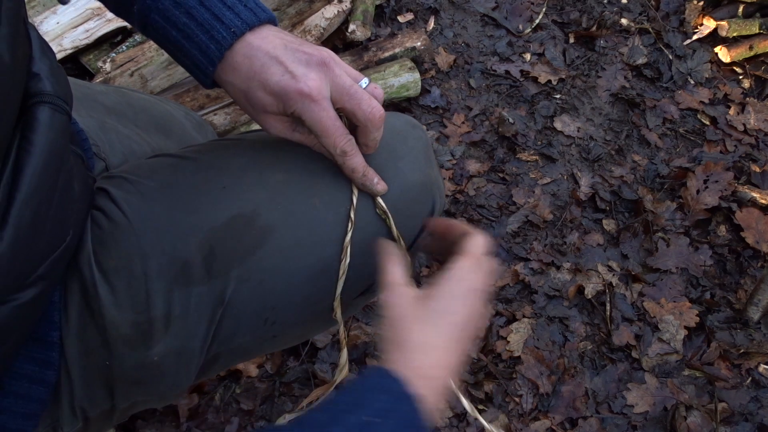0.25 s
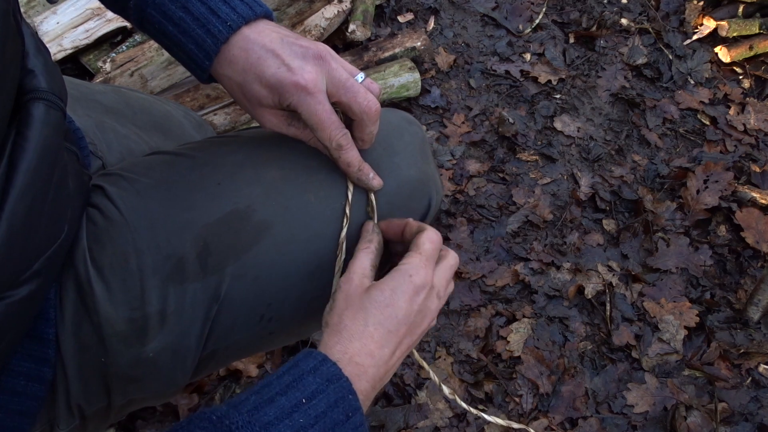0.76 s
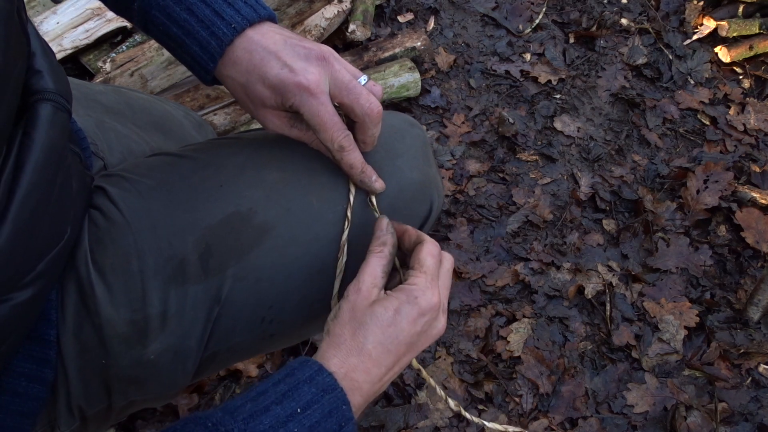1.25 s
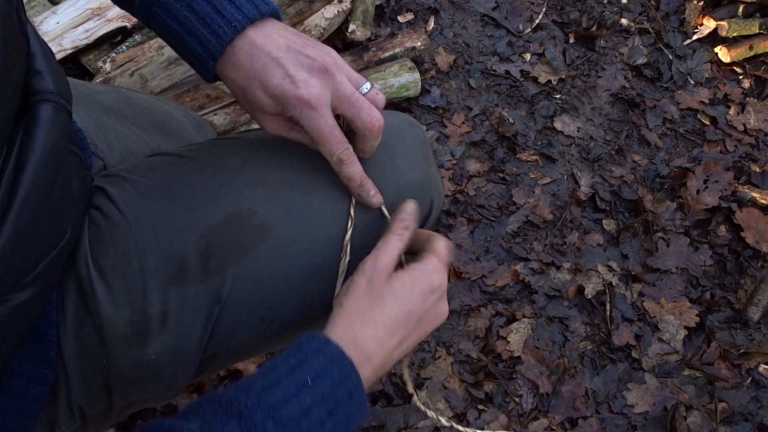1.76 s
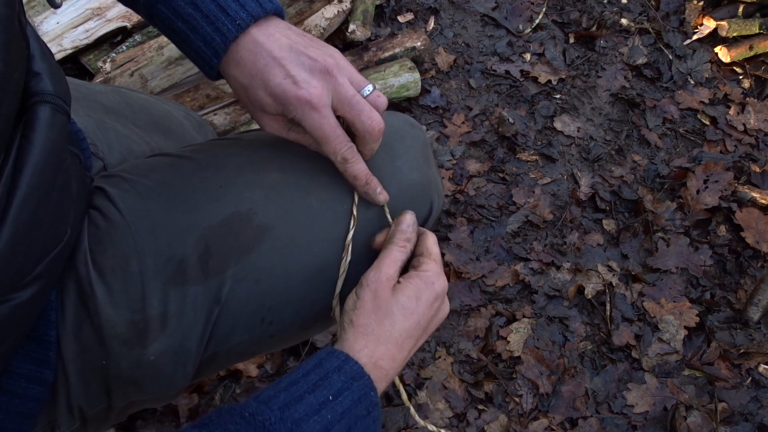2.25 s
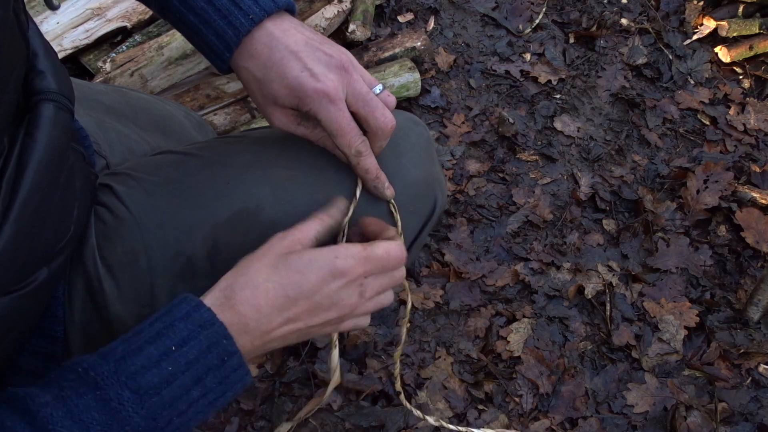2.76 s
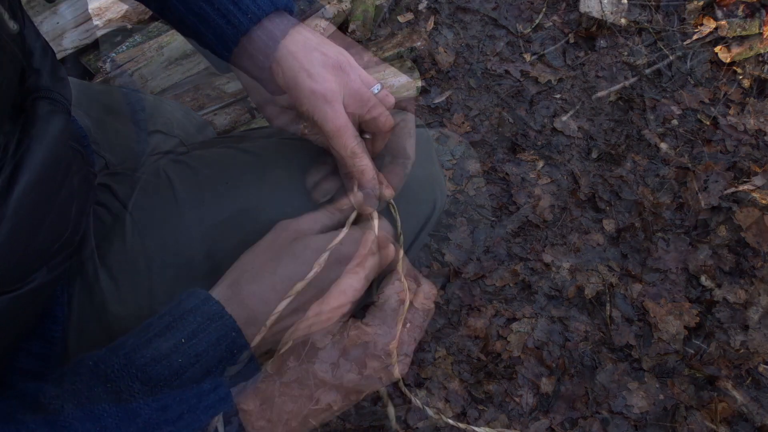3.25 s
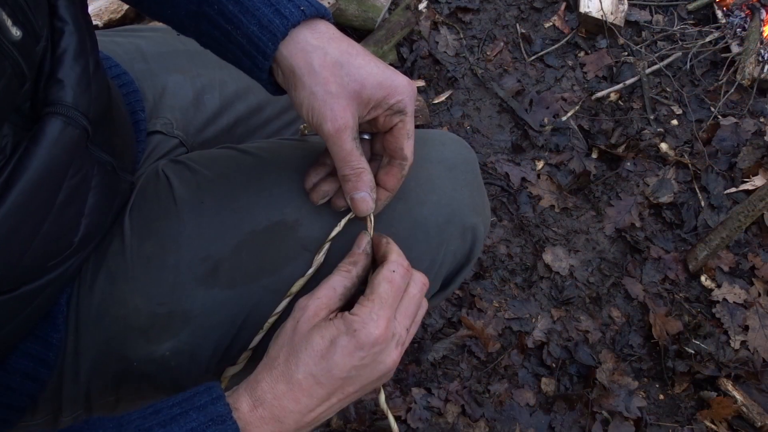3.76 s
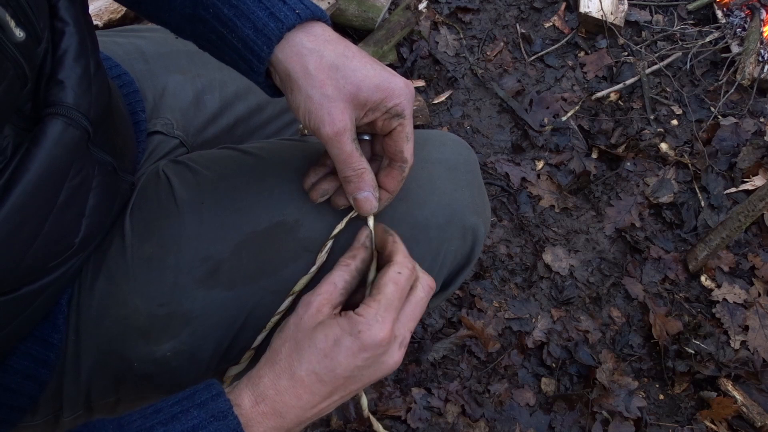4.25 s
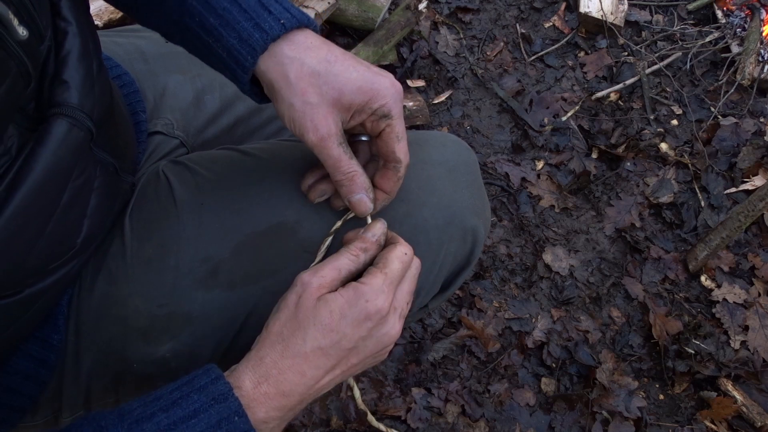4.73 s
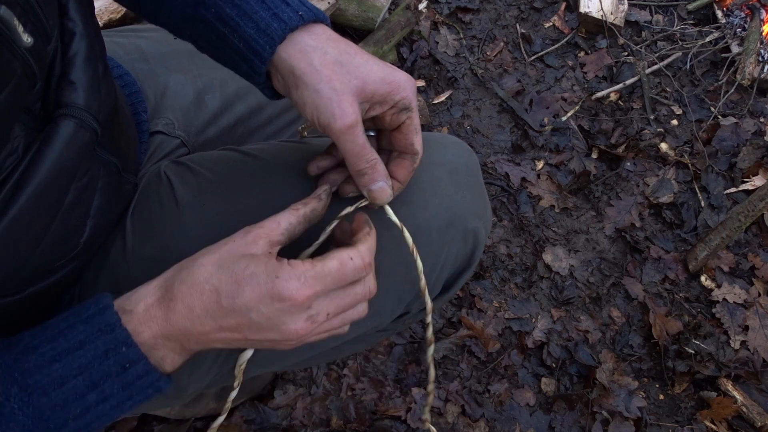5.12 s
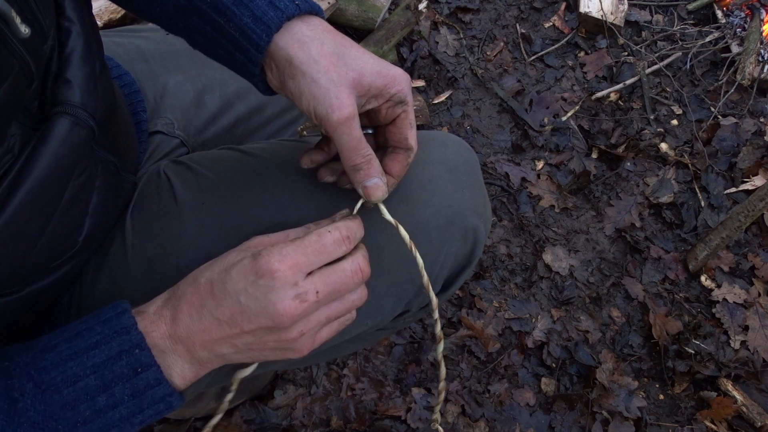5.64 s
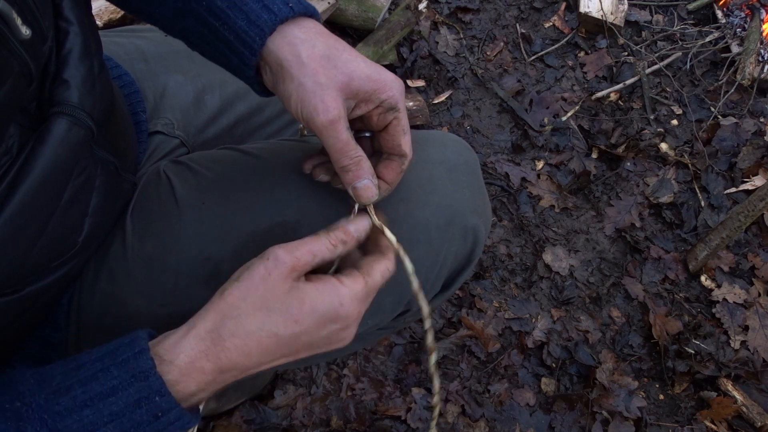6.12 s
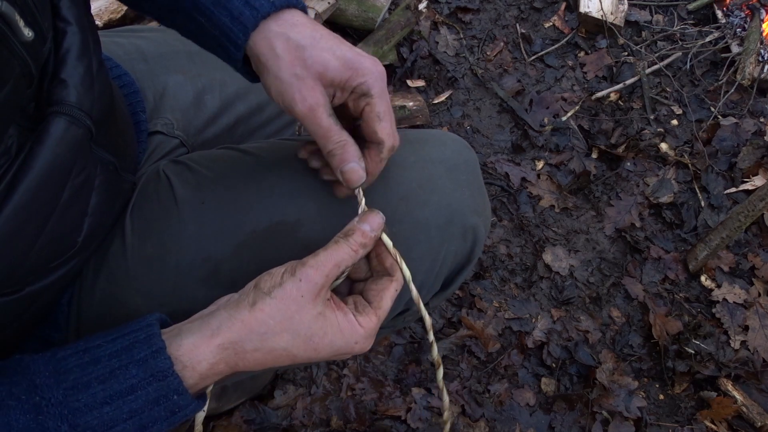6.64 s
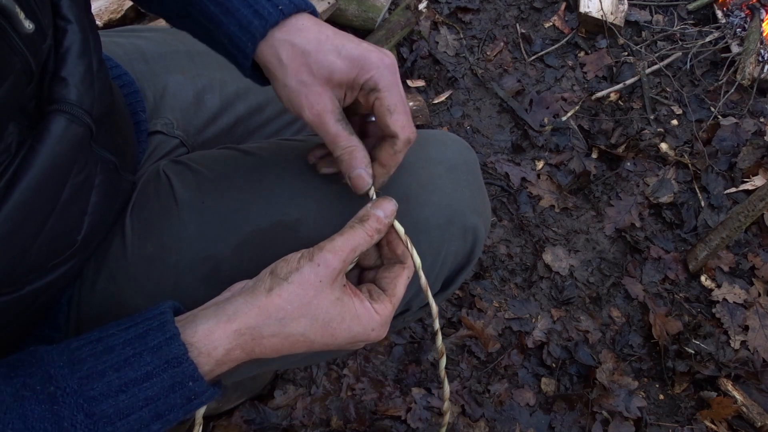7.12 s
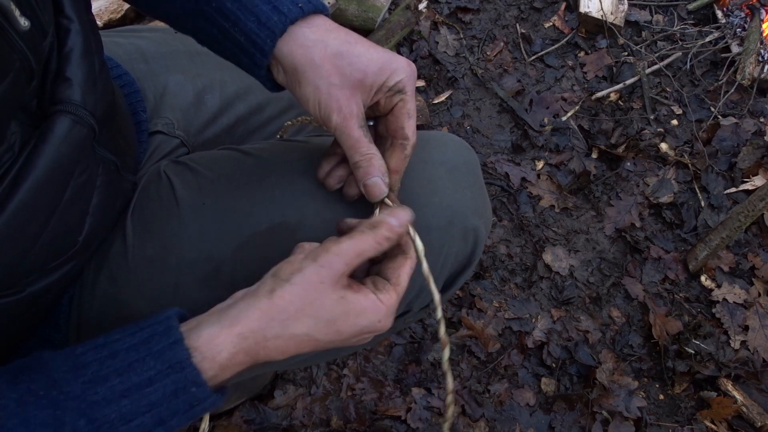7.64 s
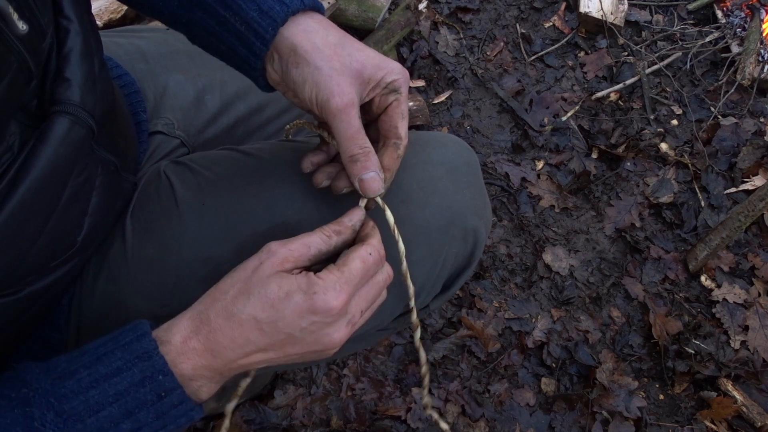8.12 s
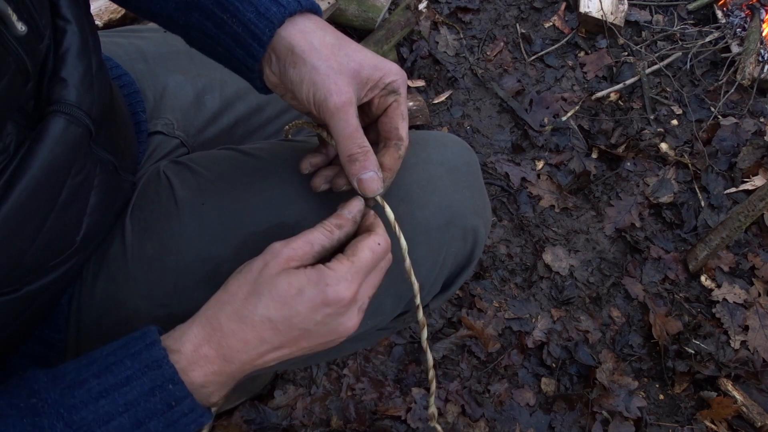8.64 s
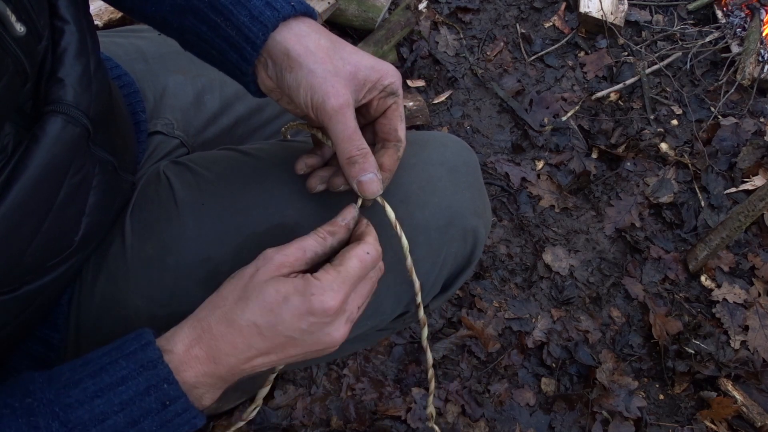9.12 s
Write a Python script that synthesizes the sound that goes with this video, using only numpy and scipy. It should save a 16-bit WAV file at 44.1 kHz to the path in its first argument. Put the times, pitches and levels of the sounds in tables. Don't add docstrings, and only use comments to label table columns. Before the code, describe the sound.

A woodland campfire, close stereo microphones a step away. A faint steady steam hiss, soft low flame flutter and distant low hum lie far beneath the crackle. At 0.1-0.5 s a dry bark cord drags with a grainy rustle and tiny fibre snaps. Separate pops follow, stronger at 1.2 and 1.8 s. At 2.3 s a log splits with the loudest bang, nearly full level, its bright echo scattering through the trees. Around 3.2-3.3 s the place crossfades to another spot by the fire: hiss duller, more sputtering. Snaps at 3.3 and 4.5 s lead to a dense run of hard cracks from 5.2 to 5.9 s. Smaller pops continue, with sharper ones at 7.2, 7.5, 7.8 and 8.0 s. Steam jets swell softly near 8.2 and 9.3 s among light ticks and a few snaps around 9 s.

```python
import sys
import numpy as np
from scipy import signal
from scipy.fft import rfft, irfft, next_fast_len
from scipy.io import wavfile
from scipy.ndimage import uniform_filter1d, map_coordinates

SR = 44100
rng = np.random.default_rng(int(sys.argv[2]) if len(sys.argv) > 2 else 0)


def gain_from_decibels(decibels):
    exponent = np.asarray(decibels, float) / 20
    return 10 ** exponent


def to_wav(sig):
    pcm = np.clip(np.atleast_2d(sig), -1, 1) * 32767
    pcm = np.round(pcm).astype(np.int16)
    wavfile.write(sys.argv[1], SR, pcm.T)


N = 414099

# leave_s, arrive_s
MOVE = (3.22, 3.34)


def unit(x):
    return x / np.sqrt(np.mean(x ** 2) + 1e-20)


def along(points, hz):
    f, v = np.transpose(points)
    return np.interp(np.log(hz + 1), np.log(f + 1), v)


def wobble(rate):
    knots = rng.standard_normal(int(N * rate / SR) + 4)
    return map_coordinates(knots, [np.arange(N) * rate / SR])


def swells(events, width_s):
    t = np.arange(N) / SR
    return sum(db * np.exp(-((t - s) / width_s) ** 2) for s, db in events)


def filtered(x, response):
    m = 2 * next_fast_len(x.shape[-1] // 2 + 512)
    spectrum = rfft(x, m) * response(np.fft.rfftfreq(m, 1 / SR))
    return irfft(spectrum, m)[..., :x.shape[-1]]


def resonance(f, hz, width_hz):
    return 1j * f * width_hz / (hz * hz - f * f + 1j * f * width_hz)


def again(f, delay, gain):
    return 1 + gain * np.exp(-2j * np.pi * f * delay)


def causal(gain_db):
    cepstrum = irfft(gain_db * np.log(10) / 20)
    cepstrum[1:len(gain_db) - 1] *= 2
    cepstrum[len(gain_db):] = 0
    return np.exp(rfft(cepstrum))


def add(track, s, sound):
    start = round(s * SR)
    track[:, start:start + sound.shape[1]] += sound


def moved():
    return np.interp(np.arange(N) / SR, MOVE, (0, 1))


def placed(first_db, second_db):
    return first_db + moved() * (second_db - first_db)


def rush(spectrum, patchy_db, start=0, stop=N):
    # pitch_hz, correlation
    likeness = [(40, .75), (130, 0.94), (700, 0.83), (1400, 0.87), (3000, 0.26), (7000, 1), (14000, .1)]
    z = signal.stft(rng.standard_normal((2, stop - start)), nperseg=512)[2]
    field = uniform_filter1d(rng.standard_normal(z.shape[1:]), size=6, axis=0)
    field = uniform_filter1d(field, size=14, axis=1)
    pair = signal.istft(z * gain_from_decibels(patchy_db * unit(field)), nperseg=512)[1][:, :stop - start]
    turn = lambda hz: np.arccos(np.clip(along(likeness, hz), -1, 1)) / 2
    mid, side = filtered(pair, lambda hz: gain_from_decibels(along(spectrum, hz)) * [np.cos(turn(hz)), np.sin(turn(hz))])
    return np.pad(unit(np.array([mid + side, mid - side])), ((0, 0), (start, N - stop)))


def two_places(first, first_patchy_db, second, second_patchy_db):
    leave, arrive = (np.array(MOVE) * SR).astype(int)
    before = np.sqrt(1 - moved()) * rush(first, first_patchy_db, stop=arrive)
    after = np.sqrt(moved()) * rush(second, second_patchy_db, start=leave)
    return before + after


def burst(scatter_db, t60):
    t = np.arange(512) / SR
    shared, left, right = rng.standard_normal((3, len(t)))
    apart = .3 * np.gradient([left, right], axis=1)
    scatter = (shared + apart) * gain_from_decibels(scatter_db - 60 * t / t60)
    scatter[:, 0] = 1
    broad = uniform_filter1d(np.abs(rfft(scatter[0])) ** 2, size=13)
    return irfft(rfft(scatter) * causal(-10 * np.log10(broad + 1e-6)))


def woodland(depth=1):
    # pitch_hz, t60_s
    trunk_t60 = [(200, .15), (1000, .3), (2500, 0.33), (5000, 0.41), (12000, .12)]
    hz, t, z = signal.stft(rng.standard_normal((3, SR // 3)), SR, nperseg=128)
    lumps_db = 3 * uniform_filter1d(rng.standard_normal(len(t)), size=2)
    trunks = gain_from_decibels(lumps_db - 60 * t / (depth * along(trunk_t60, hz)[:, None]))
    litter = gain_from_decibels(17.5 - 60 * t / .035)
    shared, left, right = signal.istft(z * (trunks + litter), SR, nperseg=128)[1]
    tail = shared + 0.54 * np.array([left, right])
    return tail / np.linalg.norm(tail[0])


def hum():
    # pitch_hz, density_db per Hz
    hum_colour = [(240, -33.5), (400, -10.5), (591, -2), (928, 0.5), (1460, -9), (2000, -16), (2600, -39.5),
                  (4400, -120)]
    return gain_from_decibels(placed(-60, -62)) * rush(hum_colour, patchy_db=1.3)


def flames():
    # pitch_hz, density_db per Hz
    flame_near = [(15, -37.5), (25, -7.5), (118, 0), (248, 0), (343, -5.5), (389, -3.5), (447, -10),
                  (500, -11), (650, -36), (1100, -120)]
    flame_far = [(15, -41), (25, -2), (75, 0.5), (172, 0.5), (500, -10), (650, -36), (1100, -120)]
    # peak_s, rise_db
    draughts = [(.2, 5.5), (.6, 2.5), (1, 3.5), (1.78, 4), (2.95, 1.5), (7.4, 1.5), (7.9, 1), (8.95, 2)]
    flutter_db = .8 * wobble(7)
    level_db = placed(-57.5, -59.5) + swells(draughts, width_s=.2) + flutter_db
    return gain_from_decibels(level_db) * two_places(flame_near, 1.2, flame_far, 1)


def steam():
    # pitch_hz, density_db per Hz
    steam_near = [(940, -19.5), (1600, -7.5), (1880, -3.5), (2570, -0.5), (2960, -6), (3260, -5), (3740, 0),
                  (6220, 3), (7690, -7), (8470, -4.5), (9880, -5), (16000, -42.5)]
    steam_far = [(940, -45), (1600, -9.5), (2160, -1.5), (2470, 0.5), (3430, -3.5), (5230, 0.5),
                 (6720, -0.5), (9690, -10), (16000, -35.5)]
    # peak_s, rise_db
    jet_times = [
        (8.2, 21),
        (9.3, 20),
    ]
    hiss = two_places(steam_near, .2, steam_far, 1.7)
    sputter_db = (.4 + .6 * moved()) * wobble(22)
    crack = filtered(hiss, lambda f: resonance(f, hz=6000, width_hz=2400))
    jet = gain_from_decibels(-21 + swells(jet_times, width_s=0.3)) * crack
    return gain_from_decibels(placed(-58, -63.2) + sputter_db) * (hiss + jet)


def cord():
    # pitch_hz, density_db per Hz
    bark_colour = [(300, -23.5), (1200, -4.5), (3000, -5), (6000, -5), (10000, -21), (14000, -53)]
    # start_s, full_s, let_go_s, end_s
    drag = (.1, .33, .45, .5)
    level_db = np.interp(np.arange(N) / SR, drag, (-64.5, -56, -56, -80), -120, -120)
    grains_db = 5.1 * wobble(260) - 4.0
    return gain_from_decibels(level_db + grains_db) * rush(bark_colour, 2.3, stop=SR)


def ticks():
    # start_s, peak_db, pitch_hz
    fibres = [(0.194, -45, 4670), (0.275, -41, 4520), (0.3304, -43, 5250), (0.344, -36, 5230),
              (0.3626, -44, 6000), (0.3844, -47, 5490), (0.4194, -45, 3820), (0.44, -38.5, 3300)]
    # start_s, peak_db, pitch_hz
    char_ticks = [(1.475, -43, 3470), (1.91, -49, 6010), (1.9824, -37, 5870), (2.908, -41, 5420),
                  (4.054, -46, 2860), (4.3927, -44, 2440), (4.433, -42.5, 6790), (4.7292, -36.5, 5980),
                  (4.7485, -45, 7500), (5.01, -36, 3700), (5.3029, -41, 6120), (5.3458, -43, 6520),
                  (5.3987, -38.5, 6050), (5.5912, -50, 3500), (5.9914, -45, 5700), (6.8838, -46, 5220),
                  (7.087, -40.5, 5450), (7.3903, -37, 9960), (8.1286, -40, 5860), (8.311, -41.5, 6060),
                  (8.4367, -45, 5800), (8.522, -47, 6780), (8.535, -43, 1990), (8.7867, -39, 5570),
                  (8.8347, -38, 5940), (8.888, -47, 5900), (9.1056, -46.5, 6440), (9.1262, -45, 5570),
                  (9.2366, -47, 6840), (9.3293, -43.5, 6410)]
    herald_times = [4.9468, 5.1405, 7.0266, 7.2012, 7.4401, 9.0759]
    # pitch_hz, gain_db
    path_gain = [(100, 11), (8000, 0.5), (11000, -3.5), (13000, -21.5), (16000, -32)]
    track = np.zeros((2, N + SR))
    when, size, pitch = rng.random((160, 3)).T
    swarm = np.transpose([when * N / SR, -60 + 8 * size ** 2, 3500 + 6500 * pitch])
    heralds = [(s, -48, 6300) for s in herald_times]
    for s, db, hz in [*fibres, *char_ticks, *heralds, *swarm]:
        char = lambda f: resonance(f, hz, 0.29 * hz) + 0.17 * resonance(f, 5000, 5000)
        add(track, s, gain_from_decibels(db + 19.5) * filtered(burst(-8.5, 0.011), char))
    return filtered(track[:, :N], lambda f: causal(along(path_gain, f)))


def bursts():
    # start_s, snap_db, knock_over_snap_db, spit_over_snap_db, pocket_hz
    deep_bursts = [(0.0493, -31.5, -8.5, -16.0, 1360), (0.6948, -35, 0, -26, 1340),
                   (1.6758, -28, -11, -30.0, 1310), (1.7647, -12.0, -18.0, -21.5, 1110),
                   (2.2712, -32, -9, -26, 2600), (2.6085, -33.5, -14, -33, 1150.0),
                   (2.9737, -21, -15.5, -35, 2720.0), (3.299, -17.5, -24.5, -22, 2200.0),
                   (3.3667, -28.5, -21, -22, 1010.0), (3.4077, -34.0, -8.5, -30.0, 703.0),
                   (3.8788, -36.0, -17.5, -18.0, 3700), (4.0949, -25, -20, -39, 1280),
                   (4.1866, -58.5, 8.5, -15.0, 700.0), (4.2437, -34, -29.5, -23, 1010.0),
                   (4.5452, -11.5, -22.0, -17.5, 3800), (4.7008, -16.5, -20, -31.5, 890),
                   (4.9621, -16.5, -23, -24, 2800), (5.7261, -7, -19.0, -27.0, 2310),
                   (6.6589, -30, -19.5, -29, 860.0), (7.1388, -32.0, -24.0, -14.5, 3820.0),
                   (7.8225, -17.5, -16, -20.5, 2980), (8.5998, -33.5, -20.0, -17.5, 964.0)]
    # start_s, snap_db, then knock, crack and spit over_snap_db
    shallow_bursts = [(1.185, -9.5, -23, -27, -26), (4.567, -27.5, -17, -17, -28),
                      (4.9864, -28, -22, -17, -17.5), (5.1608, -3.5, -22.5, -18.5, -36.5),
                      (5.221, -5.5, -17.5, -14, -21.5), (5.665, -8, -26.5, -23, -22.5),
                      (5.9309, -5.5, -20.5, -13, -21.5), (6.1477, -18, -27, -22, -20),
                      (6.2143, -22.5, -27, -19.5, -20.5), (6.5997, -29.5, -24.5, -13.5, -28),
                      (7.0527, -28, -27.5, -19, -19.5), (7.2163, -11.5, -14, -15.5, -20.5),
                      (7.456, -17.5, -25.5, -15.5, -22), (7.728, -28, -30, -18, -24),
                      (7.7708, -30, -18.5, -17, -22), (8.0361, -15, -18.5, -17.5, -20),
                      (9.0116, -30, -33.5, -22, -26.5), (9.0902, -22.5, -26, -19.5, -24.5)]
    found = []
    for s, snap, knock, spit, hz in deep_bursts:
        bark_db = -10.5 if s > MOVE[0] else -14.5
        crack_db = bark_db + 0.29 * snap + 0.48 * (snap + knock)
        found.append((s, snap, snap + knock, crack_db, snap + spit, hz))
    for s, snap, knock, crack, spit in shallow_bursts:
        found.append((s, snap, snap + knock, snap + crack, snap + spit, 6190))
    return sorted(found)


def pops():
    # pitch_hz, gain_db
    log_near = [(60, 9.5), (300, 36), (850, 30), (1270, 36), (1800, 29.5)]
    log_far = [(25, -10), (70, 16), (300, 34.5), (600, 34.5), (900, 35), (1500, 36)]
    # pitch_hz, gain_db
    sent_back = [(200, -20.5), (1200, -17.5), (2500, -17.5), (5000, -12), (10000, -16), (14000, -28)]
    # start_s, gap_s, gain
    twin_s, twin_gap_s, twin_gain = (7.216, 0.000304, 0.94)
    near, echo = np.zeros((2, 2, N + SR))
    jump = np.arange(512) == 0
    for s, snap_db, knock_db, crack_db, spit_db, pocket_hz in bursts():
        log = [(hz, knock_db + db) for hz, db in (log_near if s < MOVE[0] else log_far)]
        colour = log + [(2900, crack_db + 30.5), (5000, snap_db + 14.5), (6800, snap_db + 15.5),
                        (8600, spit_db + 33), (11000, spit_db + 20.5), (13500, spit_db + 8),
                        (16000, spit_db - 9), (22000, spit_db - 40)]
        twin = twin_gain * (abs(s - twin_s) < .01)
        wood = lambda f: causal(along(colour, f))
        pocket = lambda f: 1 + 1.26 * resonance(f, pocket_hz, 150 + 0.13 * pocket_hz)
        add(near, s, filtered(burst(-11.5, 0.0061), lambda f: wood(f) * pocket(f) * again(f, twin_gap_s, twin)))
        add(echo, s + .002, signal.fftconvolve(filtered(jump, wood)[None], woodland(), axes=1))
    return near[:, :N] + filtered(echo[:, :N], lambda hz: gain_from_decibels(along(sent_back, hz)))


def split():
    # start_s, answer_db
    split_s, answer_db = (2.3192, -13)
    # delay_s, gain
    bounce = (0.00108, -0.73)
    # pitch_hz, density_db per Hz
    bang_colour = [(59, -30), (100, -4.5), (291, -4), (750, -10), (1280, 2), (1900, -9), (2500, -7),
                   (3700, -13.5), (5040, -21), (7200, -36), (9460, -29), (12200, -44.5), (13800, -54.5),
                   (15000, -85.5)]
    tail_colour = [(120, -40), (400, -10), (873, -10.5), (1390, -0.5), (3500, -7), (6000, -18), (9280, -27),
                   (12000, -38.5), (15600, -67), (22000, -120)]
    track = np.zeros((2, N + SR))
    bang = filtered(burst(-22.5, 0.013), lambda f: causal(along(bang_colour, f)) * again(f, *bounce))
    bang *= .97 / np.abs(bang).max()
    tail = filtered(woodland(depth=1.65), lambda f: gain_from_decibels(along(tail_colour, f)))
    tail = tail * (1 - np.exp(-np.arange(tail.shape[1]) / SR / .0006))
    add(track, split_s, bang)
    tail_gain = gain_from_decibels(answer_db) * np.linalg.norm(bang) / np.linalg.norm(tail)
    add(track, split_s + .0028, tail_gain * tail)
    return track[:, :N]


def scene():
    return hum() + flames() + steam() + cord() + ticks() + pops() + split()


def gain_control():
    # start_s, gain_db
    ducks = [
        (5.165, -5.5),
        (5.935, -1),
    ]
    t = np.arange(N) / SR
    return gain_from_decibels(sum(db * (t > s) * np.exp(-np.abs(t - s) / 0.73) for s, db in ducks))


def band_limit(x):
    return signal.sosfilt(signal.butter(12, 16520, fs=SR, output="sos"), x)


def record(dry):
    lag_s = np.array([[1], [0]]) / SR
    ports = filtered(dry * gain_control(), lambda hz: np.exp(-2j * np.pi * hz * lag_s))
    balance_db = np.array([[.2], [-.2]])
    return band_limit(ports * gain_from_decibels(balance_db))


dry = scene()
out = record(dry)
to_wav(out)
```